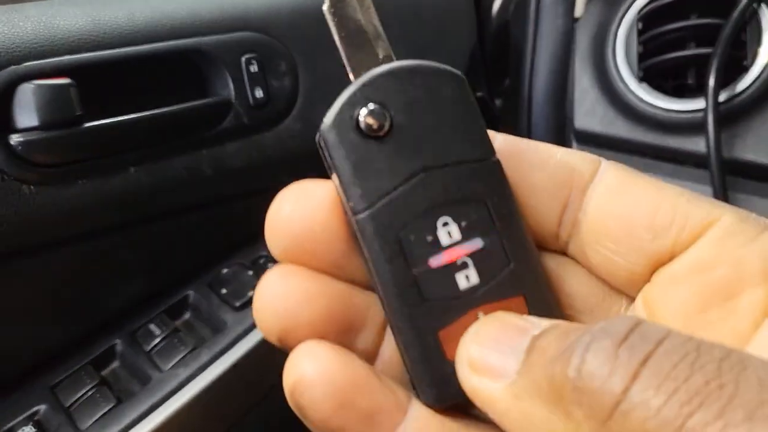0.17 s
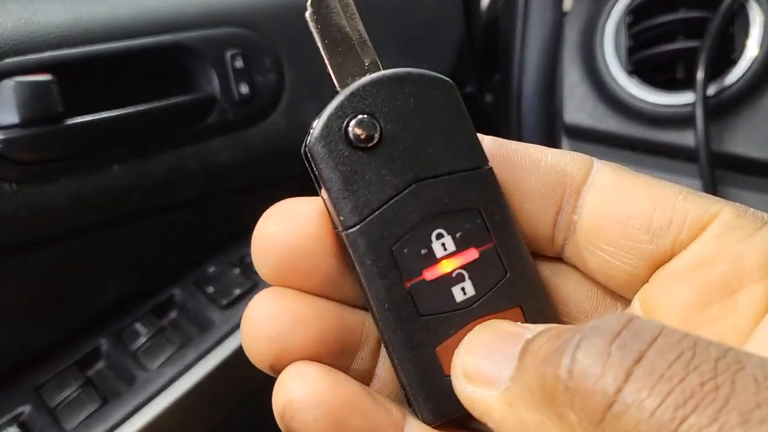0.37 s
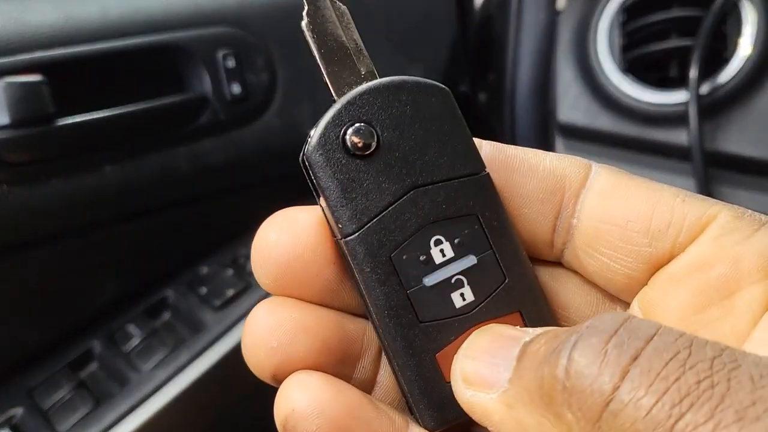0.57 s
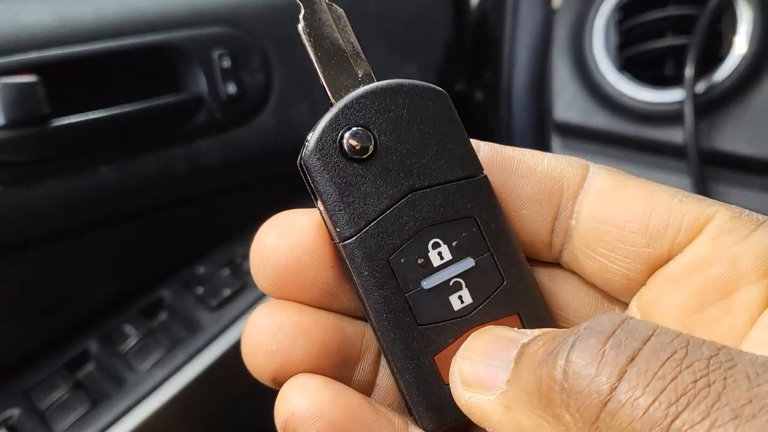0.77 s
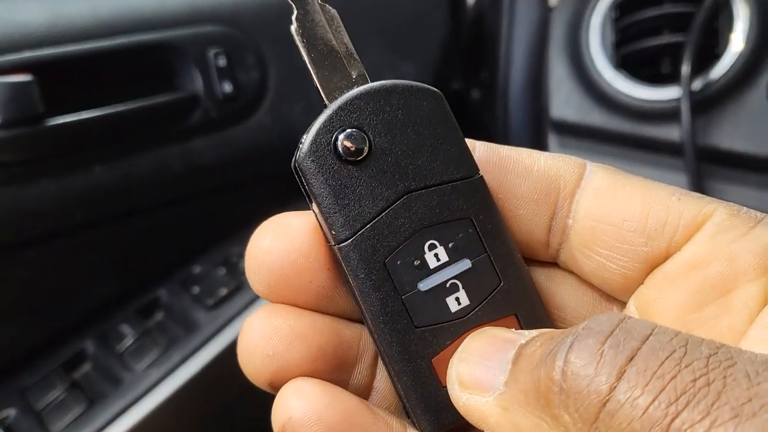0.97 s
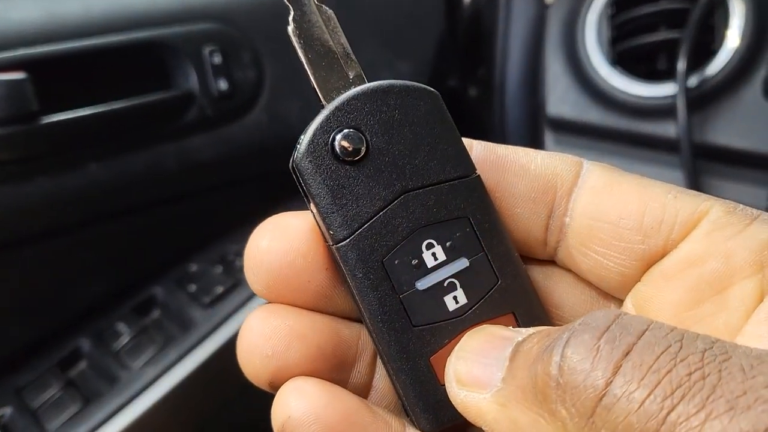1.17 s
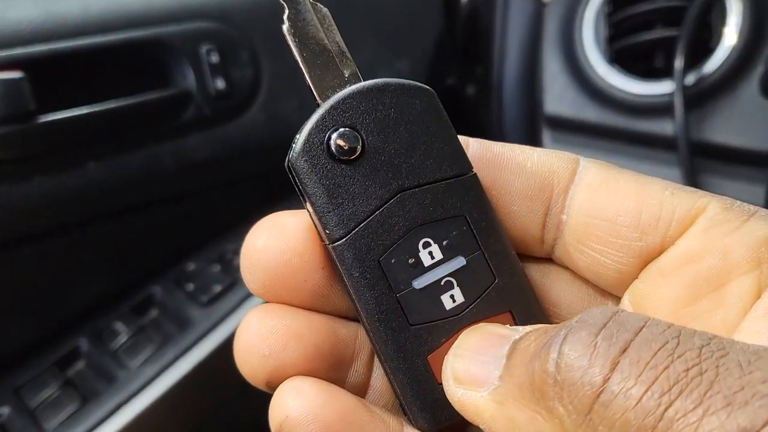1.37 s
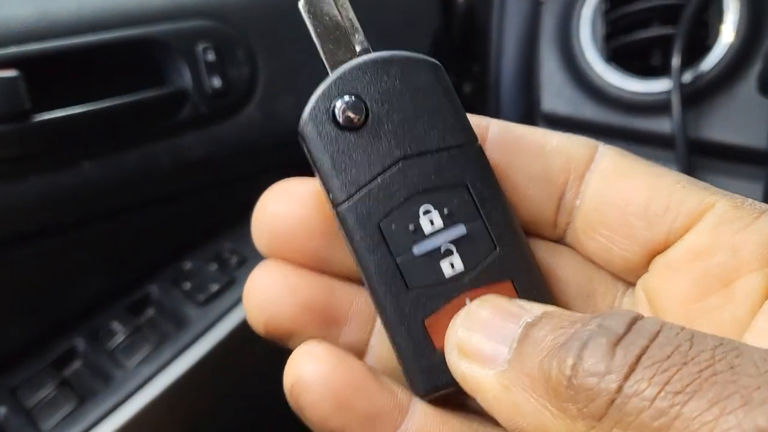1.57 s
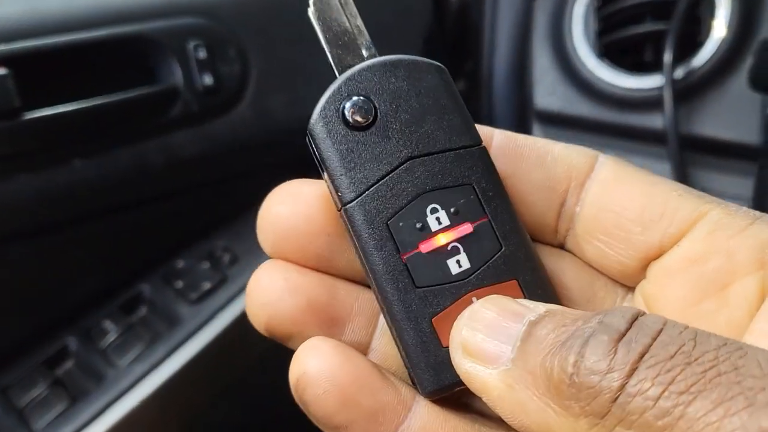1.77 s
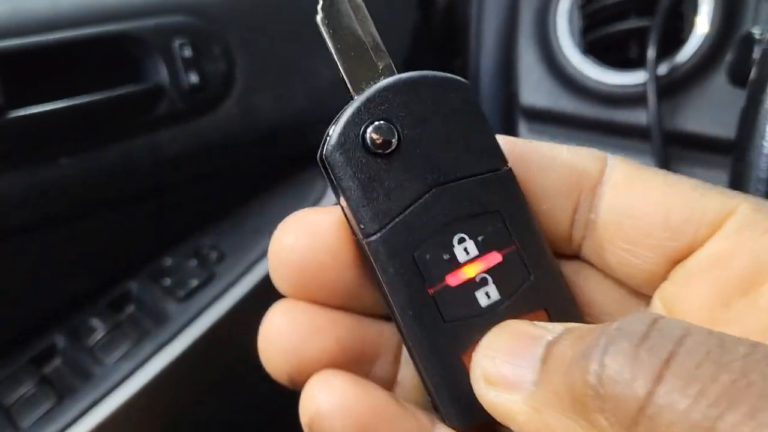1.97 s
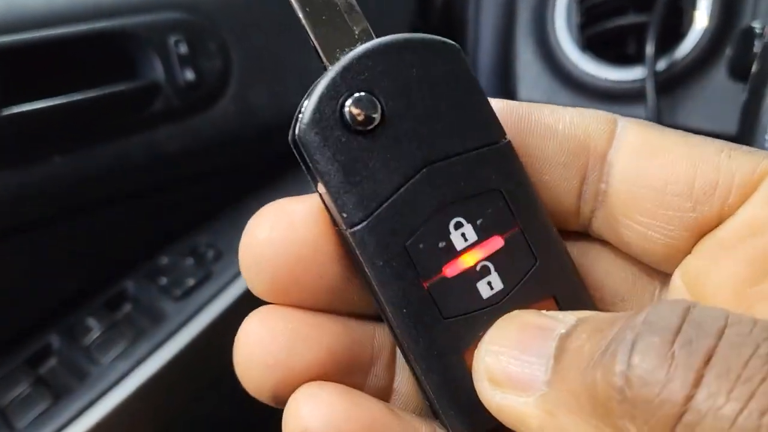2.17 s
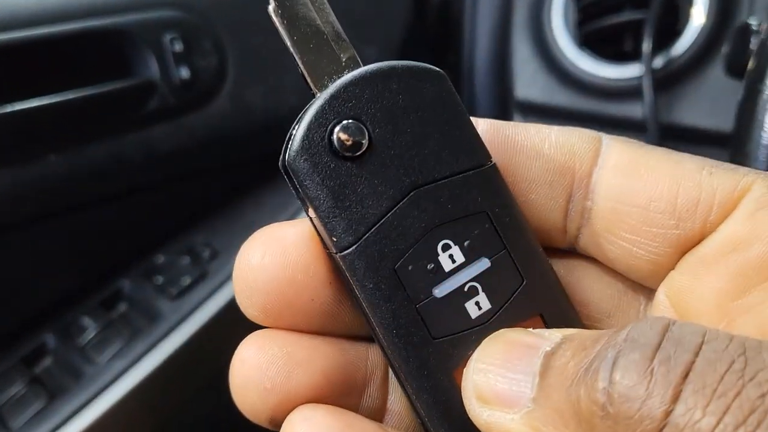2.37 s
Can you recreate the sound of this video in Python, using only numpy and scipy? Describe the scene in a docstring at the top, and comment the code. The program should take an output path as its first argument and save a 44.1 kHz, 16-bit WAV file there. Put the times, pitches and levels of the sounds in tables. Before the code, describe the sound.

Two short, loud two-tone car horn honks echo off nearby walls, with small plastic button clicks

```python
"""First a brief rub, a bump and finger taps over faint air, then a button click, more bumps and
ticking relays. We are inside a parked car with the door open; a thumb presses a key fob button.
The car's two-tone horn honks twice and rings back from nearby walls; more clicks follow the first.
Knocks are dying tones, rubs and air are shaped noise, and the horn is a stack of overtones.
The recorder's gain control turns everything down when the sound is loud, then slowly recovers."""
import sys
import numpy as np
from scipy import signal
from scipy.fft import next_fast_len
from scipy.io import wavfile
from scipy.ndimage import uniform_filter1d, minimum_filter1d

SR = 44100
rng = np.random.default_rng(int(sys.argv[2]) if len(sys.argv) > 2 else 0)


def transcribe(u):
    """Save the signal u as a 16-bit wav file named by the first command-line argument.

    u: samples, shape (n,) or (channels, n), limited to [-1, 1]; the rate is SR.
    q: integer samples, one column per channel.
    """
    v = np.clip(np.atleast_2d(u).T, -1, 1)
    q = np.round(v * 32767).astype(np.int16)
    wavfile.write(sys.argv[1], SR, q)


N = 106854  # length in samples


def amp(db):
    """Turn decibels into a plain multiplier."""
    return 10 ** (np.asarray(db) / 20)


def evened(x):
    """Scale a signal so its average (rms) strength is 1."""
    return x / np.sqrt(np.mean(abs(x) ** 2) + 1e-20)


def read(points, hz):
    """Look up a curve at a pitch, with pitch spaced by its logarithm."""
    f, value = np.transpose(points)
    return np.interp(np.log(hz + 1), np.log(f + 1), value)


def add(mix, s, sound, pan_db):
    """Mix in a sound at s seconds, leaning left (positive) or right (negative)."""
    part = mix[:, round(s * SR):][:, :len(sound)]
    part += amp([[pan_db / 2], [-pan_db / 2]]) * sound[:part.shape[1]]


# How noise leans to one side. Each row: pitch in Hz, left minus right in dB.
NOISE_LEAN = [(60, 0), (380, 0.27), (2380, 1.8), (15000, -0.5)]


def noise(spectrum, same, patchy_db):
    """Two-channel noise, rms 1: shaped by pitch, partly alike in both ears, with drifting patches."""
    frames, hz = N // 256 + 9, np.fft.rfftfreq(1024, 1 / SR)
    a, b, c, d, patches = rng.standard_normal((frames, 513, 5)).T
    patches = evened(uniform_filter1d(uniform_filter1d(patches, 8, 0), 14, 1))
    same = np.clip(read(same, hz), -1, 1)[:, None]
    left = a + 1j * b
    right = same * left + np.sqrt(1 - same ** 2) * (c + 1j * d)
    lean = read(NOISE_LEAN, hz)[:, None] / 2
    level_db = read(spectrum, hz)[:, None] + patchy_db * patches
    z = np.array([left, right]) * amp(level_db + np.array([lean, -lean]))
    return evened(signal.istft(z, nperseg=1024, noverlap=768)[1][:, 768:N + 768])


def ring(modes, soft_s):
    """A struck object: its tones die away together after a short soft start, peak 1."""
    t = np.arange(6000) / SR
    tones = sum(amp(db - 60 * t / t60) * np.sin(2 * np.pi * hz * t) for hz, db, t60 in modes)
    x = tones * np.minimum(t / soft_s, 1)
    return x / abs(x).max()


# Colour of the air noise. Each row: pitch in Hz, relative level in dB per Hz.
AIR_COLOUR = [(15, -33), (28, -20), (42, 2.5), (62, -20), (108, -11), (185, -8.5), (229, -16), (335, -13.5),
              (560, -30), (1520, -31), (2110, -44.5), (5000, -46.5), (11300, -52.5), (16000, -79)]
# How alike the air is in both ears. Each row: pitch in Hz, likeness from -1 (opposite) to 1 (same).
AIR_LIKENESS = [(60, 0.98), (240, 0.79), (950, -0.29), (3770, -0.2), (15000, 0.54)]


def air():
    """Steady air: faint noise, strongest in the bass."""
    return amp(-49) * noise(AIR_COLOUR, AIR_LIKENESS, patchy_db=.7)


# Skin on plastic. Each row: time in seconds, hiss level in dB, scrape level in dB.
RUB_LEVELS = [(0.01, -73, -78), (0.024, -63, -56), (0.03, -70, -51), (0.037, -56, -48),
              (0.044, -53.5, -55.5), (0.056, -68, -46), (0.066, -63, -48), (0.102, -78, -61.5),
              (0.118, -71, -62)]


def rub():
    """Skin rubbing on plastic: a high hiss and a lower scrape, each following its own level."""
    t = np.arange(N) / SR
    at, hiss_db, scrape_db = np.transpose(RUB_LEVELS)
    # Each pair: pitch in Hz, relative level in dB per Hz.
    hiss_colour = [(2500, -16.5), (4000, -6), (7500, 0.5), (16000, -19.0)]
    scrape_colour = [(500, 1.0), (900, -5), (1150, 4.5), (1500, -13.5), (2000, -9.5),
                     (2500, -20.5), (16000, -68)]
    hiss = noise(hiss_colour, [(100, .5), (16000, 0.28)], patchy_db=0)
    scrape = noise(scrape_colour, [(100, 0.4), (16000, 0.34)], patchy_db=4)
    hiss = hiss * amp(np.interp(t, at, hiss_db, -120, -120))
    return hiss + scrape * amp(np.interp(t, at, scrape_db, -120, -120))


# Hand on the recorder. Each row: start in seconds, peak in dB before the lean, pitch in Hz,
# left minus right in dB.
HAND_BUMPS = [(0.01, -36, 154, -2.5), (0.159, -33, 211, -5.5), (0.166, -25.5, 163, 0),
              (0.184, -31, 154, 2.5)]


def bumps():
    """A hand bumps the recorder: short, low, dying tones."""
    out = np.zeros((2, N))
    for s, db, hz, pan_db in HAND_BUMPS:
        add(out, s, amp(db) * ring([(hz, 0, .04)], .002), pan_db)
    return out


# Fingers on the case. Each row: start in seconds, peak in dB before the lean, pitch in Hz,
# left minus right in dB.
FINGER_TAPS = [(0.023, -43.5, 910, 3), (.036, -40, 534, -10), (0.041, -40.5, 1020, -8)]


def taps():
    """Fingers tap the case: two dying tones each, the upper one weaker and shorter."""
    out = np.zeros((2, N))
    for s, db, hz, pan_db in FINGER_TAPS:
        add(out, s, amp(db) * ring([(hz, 0, .02), (1.39 * hz, -9, .012)], 0.001), pan_db)
    return out


# Colour of the noisy tail of clicks and ticks. Each row: pitch in Hz, relative level in dB per Hz.
SNAP_COLOUR = [(800, -9.5), (2200, -14), (2800, -6), (4400, 0), (6500, -5), (10000, -13), (16000, -23)]


def snap_noise():
    """Bright, even noise from which the tails of clicks and ticks are cut."""
    return noise(SNAP_COLOUR, [(100, 0.72), (16000, 0.15)], patchy_db=0)


def add_tail(out, snap, s, tail):
    """Mix in a slice of snap noise at s seconds, fading as the tail says."""
    begin = round(s * SR)
    out[:, begin:begin + 4000] += snap[:, begin:begin + 4000] * tail


# Clicks of the button. Each row: start in seconds, ring peak in dB before the lean,
# left minus right in dB.
BUTTON_CLICKS = [(0.1334, -21, 11), (1.576, -27.5, 2.5), (1.913, -19.5, -8)]
# Tones of the button. Each row: pitch in Hz, relative level in dB, seconds to fade by 60 dB.
BUTTON_TONES = [(1410, -19, 0.007), (2490, 3, 0.0033), (4030, -7, 0.019), (5600, -6, 0.0053),
                (6530, -0.5, 0.008), (7540, -6, 0.006), (10760, -8, 0.0041), (12400, -19, 0.005)]


def clicks(snap):
    """The button clicks: its tones ring briefly, with a quick noise tail and a fainter, longer one."""
    out, u = np.zeros((2, N)), np.arange(4000) / SR
    for s, db, pan_db in BUTTON_CLICKS:
        add(out, s, amp(db) * ring(BUTTON_TONES, 0.0012), pan_db)
        tail = amp(db - 11 - 60 * u / 0.035) + amp(db - 33 - 60 * u / 0.15)
        add_tail(out, snap, s, tail)
    return out


# Relay ticks and their bounces. Each row: start in seconds, ring peak in dB before the lean,
# left minus right in dB.
RELAY_TICKS = [(0.244, -58, -4), (0.254, -45, 11.5), (0.272, -53.5, 6), (0.655, -49, 8), (0.67, -54.5, 5)]
# Tones of a relay. Each row: pitch in Hz, relative level in dB, seconds to fade by 60 dB.
RELAY_TONES = [(1740, 0, 0.05), (1900, -2, 0.022), (3450, -20, .015), (5230, -17, 0.018), (9250, -25, .05),
               (9480, -25, .04)]


def ticks(snap):
    """Relays tick and bounce: soft-edged ringing tones with a short noisy tail."""
    out, u = np.zeros((2, N)), np.arange(4000) / SR
    for s, db, pan_db in RELAY_TICKS:
        add(out, s, amp(db) * ring(RELAY_TONES, .006), pan_db)
        add_tail(out, snap, s, amp(db - 17.5 - 60 * u / 0.048))
    return out


# How long the yard rings. Each row: pitch in Hz, seconds to fade by 60 dB.
YARD_FADE = [(300, 0.33), (500, 1), (1000, 0.76), (3000, 1.0), (7000, 0.61), (15000, 0.21)]
FAR_WALL_S, FAR_WALL_DB, FAR_SPREAD_S = .18, 5, 0.0077  # delay, boost and spread of the far wall


def yard():
    """Scattered reflections dying band by band, with a bunch from a far wall."""
    hz, t, z = signal.stft(rng.standard_normal((2, SR)), SR, nperseg=256)
    bunch_db = FAR_WALL_DB * np.exp(-((t - FAR_WALL_S) / FAR_SPREAD_S) ** 2)
    shape_db = -60 * t / read(YARD_FADE, hz)[:, None] + bunch_db
    return signal.istft(z * amp(shape_db) * np.clip(t / 0.0069, 0, 1), SR, nperseg=256)[1]


# The honks. Each row: start in seconds, length in seconds, relative level in dB.
HONK_TIMES = [(1.285, 0.254, 1), (1.788, 0.2552, 0.5)]
EASE_S = 0.004  # the release is rounded over this time


def gate(t, rise_s, fall_s, power):
    """Attack, hold and rounded release of every honk."""
    edges = 0
    for s, length, db in HONK_TIMES:
        rise = np.clip((t - s) / rise_s, 0, 1) ** power
        edges = edges + amp(db) * rise * np.exp(-np.maximum(t - s - length, 0) / fall_s)
    size = max(round(EASE_S * SR), 1)
    return uniform_filter1d(edges, size, origin=(size - 1) // 2, mode="constant")


def later(tone, hz, s):
    """An echo that lands in step with the held tone."""
    late = max(round(s * SR), 1)
    return np.concatenate([np.zeros(late), tone[:-late]]) * np.exp(2j * np.pi * hz * late / SR)


# Overtones of the two horns, one row each from the fundamental up. Each row: left level in dB,
# right level in dB, how far left leads in radians, level lingering in the yard after the honk in dB.
# All levels are before the trims below.
HIGH_OVERTONES = [(-20, -17, -0.1, -44.5), (-11.5, -20, 1.27, -34.5), (-18.5, -22, 3, -31.5),
                  (-30, -35.5, 3, -32), (-29.5, -32.5, 2, -58), (-31.5, -38, -2, -42.5),
                  (-40, -40.5, -1.1, -51.5), (-36, -44, 0.87, -50.5), (-54.5, -43.5, 5, -58),
                  (-39, -54.5, -0.4, -57.5), (-51.5, -47.5, -1, -58.5), (-52.5, -56.5, -2, -64.5),
                  (-57.5, -60, 0, -72), (-55.5, -59, 2, -67.5), (-58.5, -68, -1.4, -78),
                  (-65.5, -73, -6.5, -77), (-74, -71, -3.5, -87.5), (-90.5, -81, -1, -97),
                  (-69, -81.5, 3, -81.5), (-70, -72.5, 3, -86.5), (-75, -76, 1.6, -85.5),
                  (-57.5, -77, -3, -84.5), (-68.5, -85, 4, -88.5), (-72, -75, -3, -96),
                  (-75.5, -84.5, 2.2, -90), (-67, -74.5, 4, -91.5), (-67, -82.5, 2.5, -94.5),
                  (-74.5, -77, 2.9, -100.5), (-82.5, -88, -3.5, -100), (-75.5, -95, 4, -99)]
LOW_OVERTONES = [(-41, -36.5, 3.5, -43), (-28.5, -30, 1.3, -35), (-26, -29.5, 0.5, -36),
                 (-28.5, -43, 2.5, -33), (-33.5, -33, -0.88, -37.5), (-40.5, -28.5, 1.02, -39.5),
                 (-30.5, -44, -2, -44), (-35, -41.5, 0.8, -46.5), (-44, -40, -2, -49),
                 (-41.5, -54, 0.9, -53), (-42.5, -53, -1.5, -49.5), (-42, -50, 0.5, -53.5),
                 (-52.5, -59, -2.5, -55.5), (-42, -55, 2.2, -63), (-44, -55, -1.2, -61),
                 (-49, -57.5, 0.5, -59), (-47, -64, 0, -60.5), (-46, -57, 3.4, -64),
                 (-55.5, -61.5, 2.9, -69), (-54, -67, 4, -75.5), (-62, -71.5, -1.5, -73),
                 (-61, -72, 1.2, -75), (-63, -75, 0, -78.5), (-54.5, -72, -3.5, -77),
                 (-60, -68.5, 3.5, -76.5), (-60.5, -76, -0.3, -82.5), (-72.5, -74.5, -1, -79),
                 (-60, -77, 0.5, -84.5), (-62.5, -70, -0.8, -83.5), (-69, -67, -0.5, -90),
                 (-70.5, -75, 0, -85), (-74, -75, -1, -84.5), (-60, -79.5, -1.5, -91),
                 (-75, -91, -1.5, -94.5), (-77, -87, 4, -95.5), (-75, -105, 4.5, -96)]
# Echo from one near wall. Each row: pitch in Hz, share from 0 to 1 (0.7 at most is used).
NEAR_WALL_SHARE = [(400, 0), (1000, 0.36), (2000, 1), (6000, 0.53), (15000, 0.08)]
# Echo from the far wall. Each row: pitch in Hz, share from 0 to 1.
FAR_WALL_SHARE = [(500, 0.04), (1000, 0.07), (2000, 0.03), (5000, 0.06), (8000, 0), (15000, 0.07)]
HIGH_HZ, LOW_HZ = 483.8, 409.7
HORN_DB, LINGER_DB = 6.5, -0.5  # trims for the whole horn and for all lingering levels
START_SAG, SETTLE_S = 0.097, 0.011  # the diaphragm starts flat (share of pitch) and pulls up
WAVER = 0.00057  # slow pitch wander, share of pitch
SECOND_SHARP = .0006  # the warmed horn is a little higher on the second honk, share of pitch
WALL_S, WALL_SPREAD_S = 0.062, 0.03  # near wall delay; widest scatter of echoes either way
RISE_S, RISE_PER_OVERTONE_S, FALL_S = 0.017, 0.0016, 0.0023
RING_DOWN_S = 0.0057  # the fundamental dies slower than the overtones
SHARPNESS = 0.35  # higher overtones need a fuller swing before they speak
YARD_MOST = 1  # the yard adds at most this share of an overtone's louder side while it is held


def horn(pitch_hz, overtones, echoes):
    """Overtones come directly, off walls and from the yard, together building to their held level."""
    first = round(HONK_TIMES[0][0] * SR)
    size = next_fast_len(N - first + echoes.shape[1])
    t = (first + np.arange(N - first)) / SR
    since = t - np.max([np.where(t >= s, s, 0) for s, _, _ in HONK_TIMES], axis=0)

    waver = evened(uniform_filter1d(uniform_filter1d(rng.standard_normal(len(t)), 900), 900))
    sag = START_SAG * np.exp(-since / SETTLE_S)
    bend = 1 - sag + WAVER * waver + SECOND_SHARP * (t > HONK_TIMES[1][0])
    turns = np.cumsum(pitch_hz * bend) / SR
    # Each honk starts its cycles afresh.
    turns -= np.max([np.where(t >= s, turns[round(s * SR) - first], 0) for s, _, _ in HONK_TIMES], axis=0)

    held, after = (since > .12) & (since < .24), (since > .33) & (since < .46)
    echoes, out = np.fft.fft(echoes, size), np.zeros((2, N))
    draws = rng.random((len(overtones), 8))  # a phase and seven echo times for each overtone
    for k, (row, (phase, *spot)) in enumerate(zip(overtones, draws), 1):
        left_db, right_db, lead, linger_db = row
        hz = k * pitch_hz
        tone = gate(t, RISE_S + k * RISE_PER_OVERTONE_S, FALL_S + RING_DOWN_S / k ** 2, 1.4 + SHARPNESS * k)
        tone = tone * np.exp(2j * np.pi * (k * turns + phase))

        # The yard's echo is set by how loudly it lingers after the honk.
        wet = np.fft.ifft(np.fft.fft(tone, size) * echoes)[:, :len(t)]
        linger = np.sqrt(np.mean(abs(wet[:, after]) ** 2, axis=1, keepdims=True))
        wet *= amp(linger_db + LINGER_DB) / linger
        yard_part = np.mean(wet[:, held] / tone[held], axis=1, keepdims=True)
        full = amp([[left_db], [right_db]]) * np.exp([[1j * lead], [0]])
        tame = np.minimum(YARD_MOST * abs(full).max() / abs(yard_part), 1)
        wet, yard_part = wet * tame, yard_part * tame

        # Three scattered near-wall echoes for each ear, and one far-wall echo.
        spread_s = WALL_SPREAD_S * min(k / 8, 1)
        wall = np.array([later(tone, hz, WALL_S + spread_s * (2 * u - 1)) for u in spot[:6]])
        wall = wall.reshape(2, 3, -1).mean(1)
        far_wall = later(tone, hz, FAR_WALL_S + spread_s * (2 * spot[6] - 1))
        share, far = np.clip([read(NEAR_WALL_SHARE, hz), read(FAR_WALL_SHARE, hz)], 0, .7)
        arriving = max(1 - share - far, .05) * tone + share * wall + far * far_wall
        out[:, first:] += np.sqrt(2) * ((full - yard_part) * arriving + wet).real
    return amp(HORN_DB) * out


# The horn bracket jolts the body. Each row: start in seconds, relative level in dB.
BODY_JOLTS = [(1.291, 8.5), (1.794, 5)]
# Colours of body rattle and body buzz. Each row: pitch in Hz, relative level in dB per Hz.
RATTLE_COLOUR = [(100, -32.5), (170, -12), (280, -26.5), (400, 7.5), (540, -9.5), (640, -15.5),
                 (16000, -100)]
BUZZ_COLOUR = [(500, -20), (700, -22), (1000, 0), (2000, -4), (4000, -7), (8000, -23), (16000, -36)]
BUZZ_DB, RATTLE_DB, KICK_T60 = -43, -32, .4  # the last is the rattle's seconds to fade by 60 dB
THUMP_HZ, THUMP_DB, THUMP_T60 = 152, -39.5, 0.068
# Released, the diaphragm rings at its own pitch.
FREE_RING_HZ, FREE_RING_DB, FREE_RING_T60 = 392, -23.5, 0.11


def body():
    """Panels buzz with the horn, thump and rattle as it kicks in; the diaphragm rings free after."""
    t = np.arange(N) / SR
    kick = 0
    for s, db in BODY_JOLTS:
        fade = amp(RATTLE_DB + db - 60 * np.maximum(t - s, 0) / KICK_T60)
        kick = kick + fade * np.clip((t - s) / 0.012, 0, 1) ** 2
    buzz = noise(BUZZ_COLOUR, [(100, 0.74), (1000, 0.15), (16000, 0.22)], patchy_db=4)
    out = amp(BUZZ_DB) * gate(t, 0.019, 0.15, 1.5) * buzz
    out += kick * noise(RATTLE_COLOUR, [(100, 1.0), (1000, 0.19)], patchy_db=4)
    thump = ring([(THUMP_HZ, 0, THUMP_T60), (260, -3, .15)], 0.052)
    for s, db in BODY_JOLTS:
        add(out, s, amp(THUMP_DB + db) * thump, 0)
    free = ring([(FREE_RING_HZ, 0, FREE_RING_T60)], 0.014)
    for s, length, db in HONK_TIMES:
        add(out, s + length + 0.0042, amp(FREE_RING_DB + db) * free, 0)
        # A weaker repeat off the near wall.
        add(out, s + length + WALL_S + 0.022, amp(FREE_RING_DB + db - 5.5) * free, 3)
    return out


def scene():
    """Air, both horns, the car body, hands and relays, all added together."""
    echoes = yard()
    background = air()
    horns = horn(HIGH_HZ, HIGH_OVERTONES, echoes) + horn(LOW_HZ, LOW_OVERTONES, echoes)
    car = horns + body()
    snap = snap_noise()
    small_sounds = clicks(snap) + ticks(snap) + taps() + bumps() + rub()
    return background + car + small_sounds


LOW_CUT_HZ, EDGE_HZ = 38, 16300  # the recorder keeps what lies between
# Gain control: level where it starts, dB turned down per dB above it, and its two reaction times.
GAIN_FROM_DB, GAIN_SHARE, GAIN_FALL_S, GAIN_BACK_S = -39.5, 0.24, 0.17, 0.91


def record(dry):
    """Low cut, gain control that eases down on loud sound and recovers slowly, limiter, band limit."""
    hop = 128  # samples between gain steps
    dry = signal.sosfilt(signal.butter(6, LOW_CUT_HZ, "high", fs=SR, output="sos"), dry)
    power = uniform_filter1d((dry ** 2).mean(0), 900)[::hop]
    power_db = 10 * np.log10(abs(power) + 1e-12)
    down_db = GAIN_SHARE * np.maximum(power_db - GAIN_FROM_DB, 0)
    held = [0.]
    for want in down_db:
        react_s = GAIN_FALL_S if want > held[-1] else GAIN_BACK_S
        held.append(held[-1] + (want - held[-1]) * hop / SR / react_s)
    ducked = dry / amp(np.interp(np.arange(N) / hop, np.arange(len(held)), held))
    # The limiter dips smoothly around peaks above 1.
    limit = minimum_filter1d(1 / np.maximum(abs(ducked).max(0), 1), 2001)
    ducked = ducked * uniform_filter1d(limit, 1801)
    band_limit = signal.firwin(511, EDGE_HZ, window=("kaiser", 9), fs=SR)
    return signal.oaconvolve(ducked, band_limit[None], "same")


dry = scene()
out = record(dry)
transcribe(out)
```